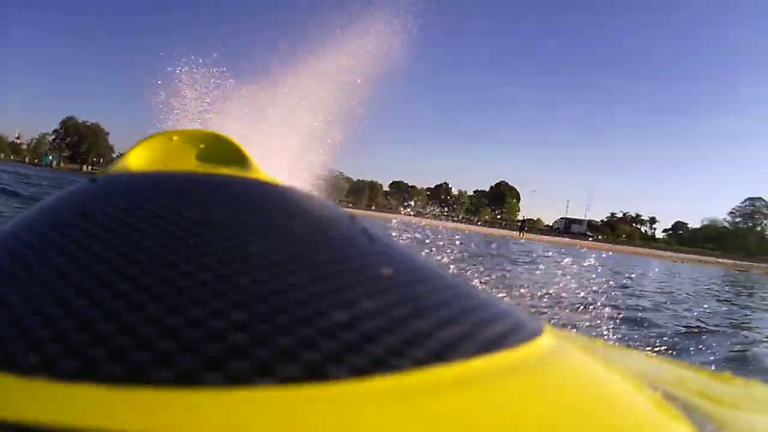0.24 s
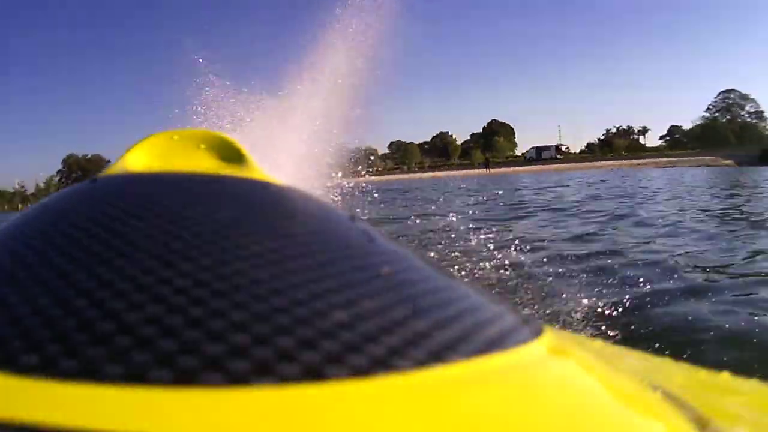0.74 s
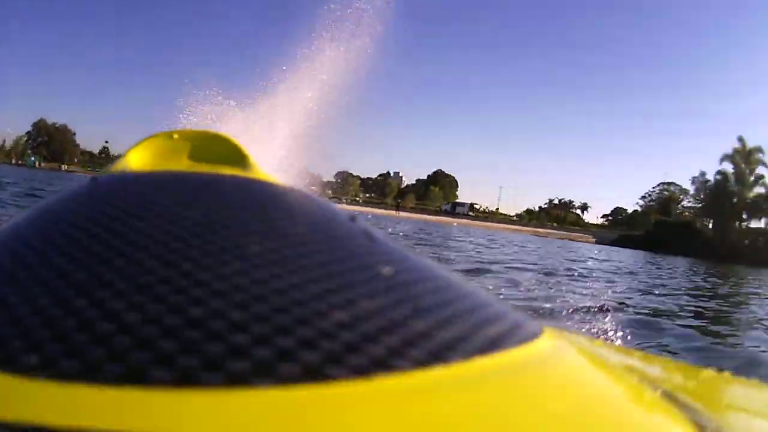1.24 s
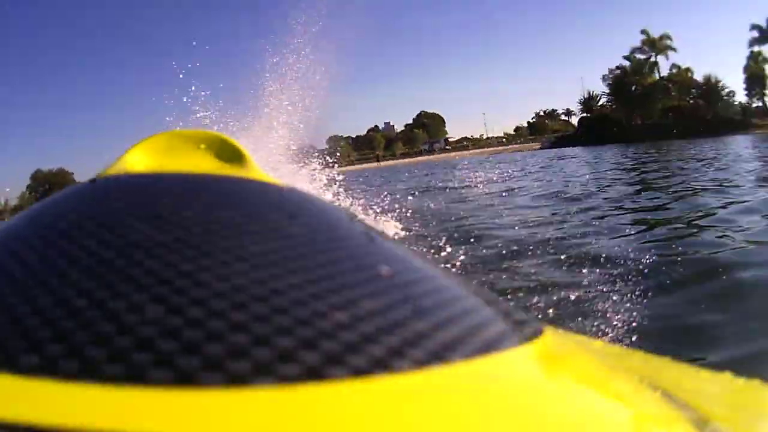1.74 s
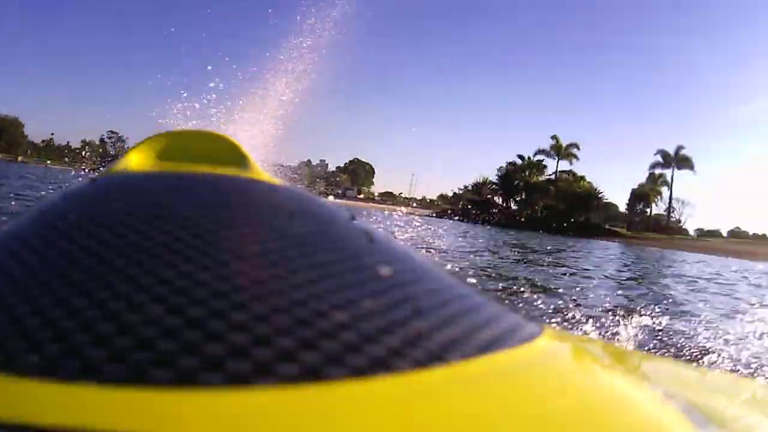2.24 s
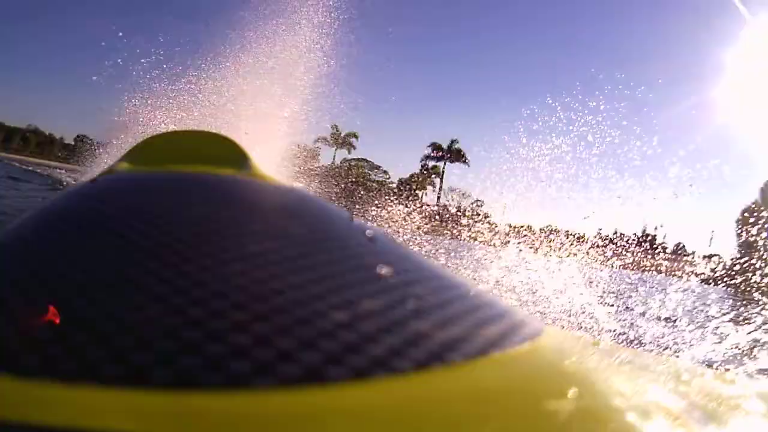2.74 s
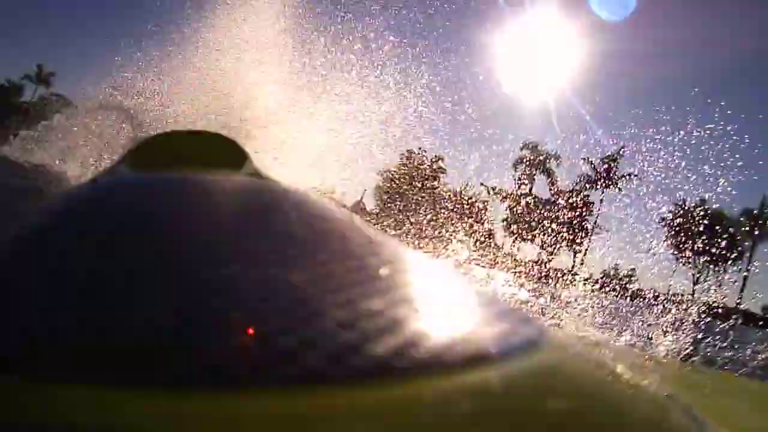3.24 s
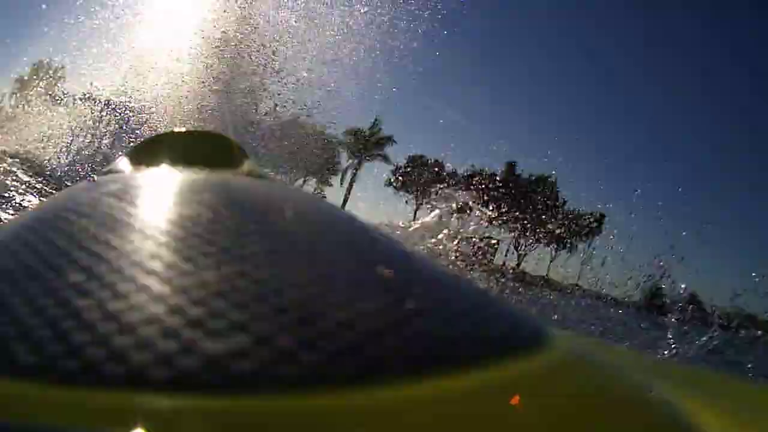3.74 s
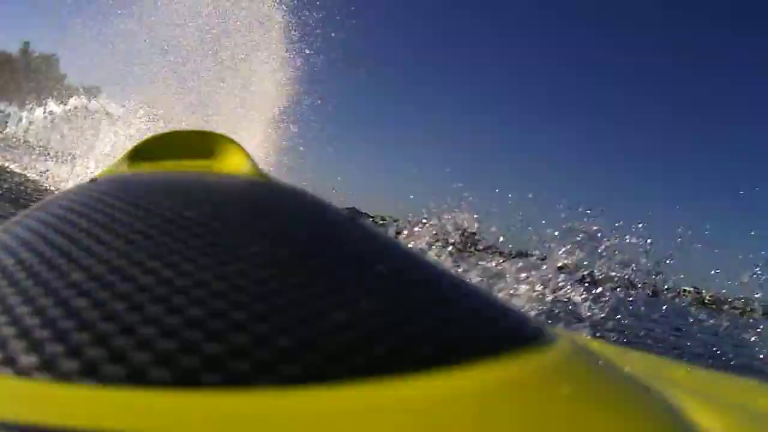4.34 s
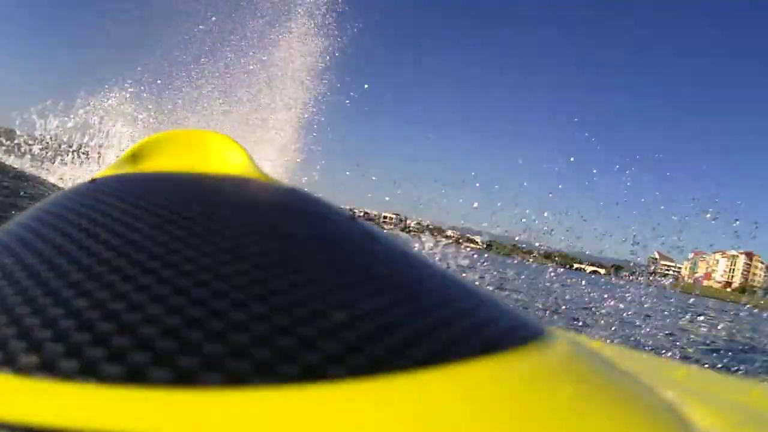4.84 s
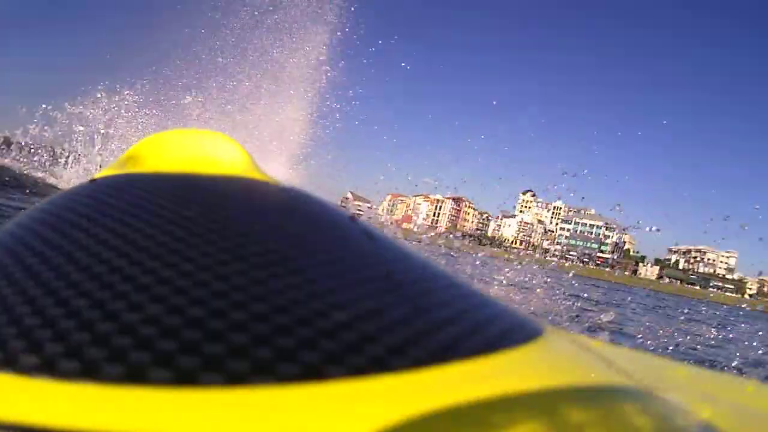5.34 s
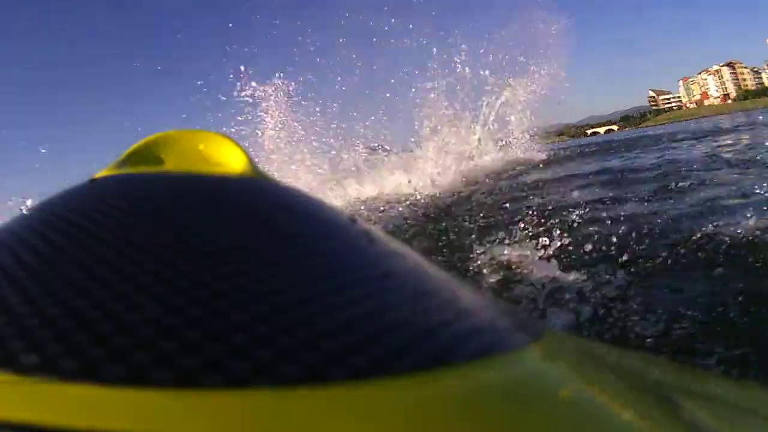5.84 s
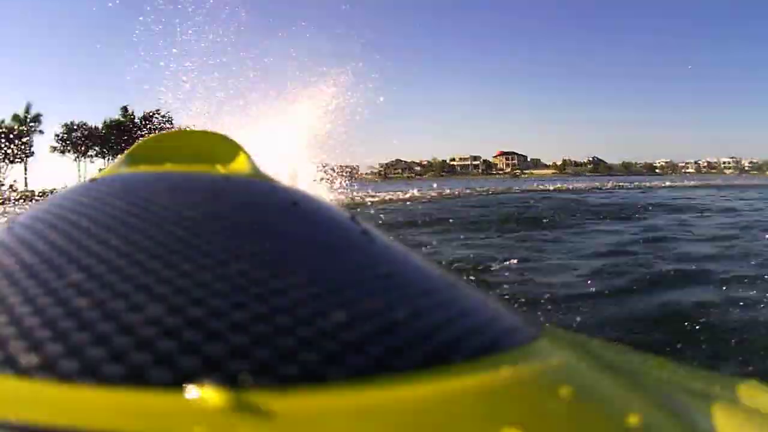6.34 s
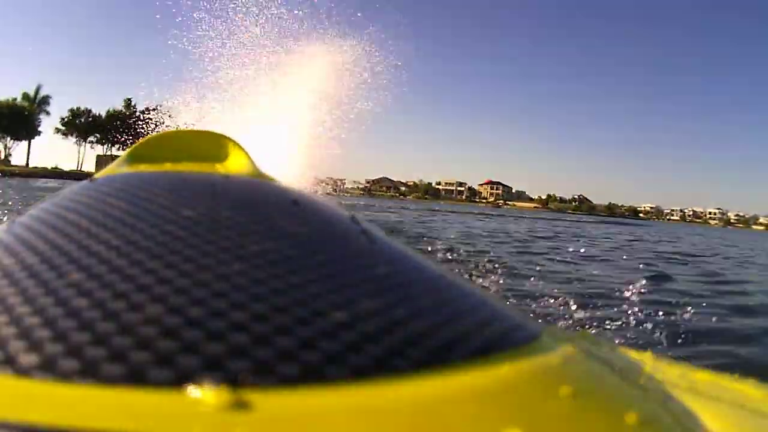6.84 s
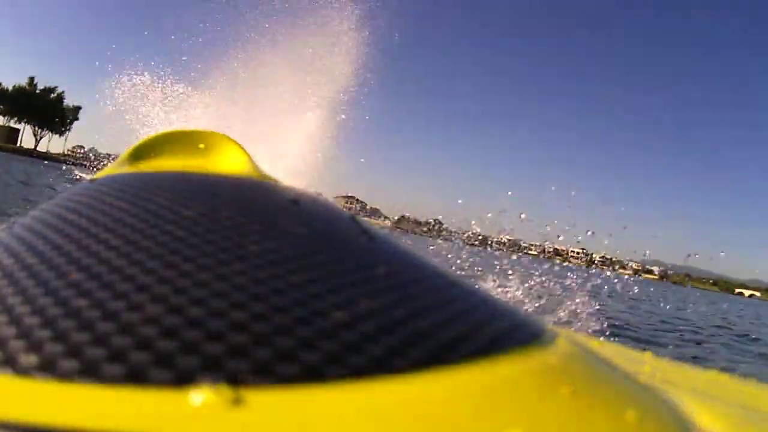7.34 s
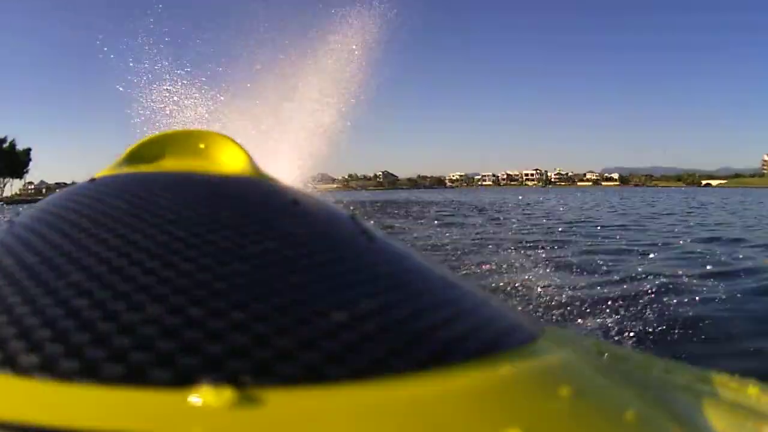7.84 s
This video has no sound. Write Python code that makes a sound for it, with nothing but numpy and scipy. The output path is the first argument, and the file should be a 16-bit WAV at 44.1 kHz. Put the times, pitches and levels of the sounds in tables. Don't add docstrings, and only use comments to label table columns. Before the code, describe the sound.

On open water, a microphone pressed to a model boat's deck picks up a rough, nasal propeller whine, ringing hull panels and steady water noise. Loud full throttle eases into a lower, fluttering drone; drops tick and slap the deck. A quick racing flare collapses in steps to a low idle, then the motor revs back up. The sound is boxy, dry and dull above four kilohertz.

```python
import sys
import numpy as np
from scipy import signal
from scipy.fft import rfft, irfft, next_fast_len
from scipy.io import wavfile
from scipy.ndimage import uniform_filter1d, map_coordinates

SR = 44100
rng = np.random.default_rng(int(sys.argv[2]) if len(sys.argv) > 2 else 0)


def wav_record(signal):
    frames = np.transpose(np.atleast_2d(signal))
    bounded = np.clip(frames, -1, 1)
    quanta = np.round(bounded * 32767).astype(np.int16)
    wavfile.write(sys.argv[1], SR, quanta)


def boost_factor(decibels):
    exponent = np.asarray(decibels, float) / 20
    return 10 ** exponent


N = 357210


def unit(x):
    return x / np.sqrt(np.mean(x ** 2) + 1e-20)


def along(points, hz):
    f, v = np.transpose(points)
    return np.interp(np.log(hz + 1), np.log(f + 1), v)


def curves(rows):
    s, *cols = np.transpose(rows)
    return [np.interp(np.arange(N) / SR, s, c) for c in cols]


def law(rows, speed):
    hz, *cols = np.transpose(sorted(rows))
    return [np.interp(speed, hz, c) for c in cols]


def bumps(rows):
    t = np.arange(N) / SR
    return sum(db * np.exp(-0.5 * ((t - s) / width) ** 2) for s, width, db in rows)


def wobble(rate):
    knots = rng.standard_normal(N // 64)
    return map_coordinates(knots, [np.arange(N) * min(rate, 600) / SR], order=2)


def filtered(x, response):
    m = next_fast_len(N + SR // 2)
    return irfft(rfft(x, m) * response(np.fft.rfftfreq(m, 1 / SR)), m)[..., :N]


def patchy(depth_db):
    z = signal.stft(rng.standard_normal(N + 512), nperseg=512)[2]
    field = uniform_filter1d(rng.standard_normal(z.shape), 5, 0)
    field = uniform_filter1d(field, 6, 1)
    return signal.istft(z * boost_factor(depth_db * unit(field)), nperseg=512)[1][:N]


# f/Hz, width/Hz, level/dB
HULL_PANELS = [
    (347, 146, -10),
    (597, 360, -24.5),
    (1060, 180, -4),
    (1162, 101, 3.5),
    (1419, 120, -1.5),
    (1840, 120, -7.5),
    (2298, 170, -13.5),
    (3406, 280, -22),
    (3924, 160, -18.5),
]


def panels(f):
    total = 0
    for k, (center, width, db) in enumerate(HULL_PANELS):
        resonance = 1j * f * width / (center * center - f * f + 1j * f * width)
        total = total + (-1) ** k * boost_factor(db) * resonance
    return total


def panel_gain(f):
    power = 1e-9
    for center, width, db in HULL_PANELS:
        power = power + (boost_factor(db) * f * width) ** 2 / ((center * center - f * f) ** 2 + (f * width) ** 2)
    return np.sqrt(power)


# t/s, shaft speed f/Hz
CRUISE = [(0, 418.8), (.12, 414.7), (.3, 420.3), (.71, 420), (1.13, 425.4), (2.8, 279.8), (3.32, 283.8),
          (3.4, 287.3), (3.9, 289.9), (4.26, 291), (4.6, 297.8), (5.425, 298.2), (7.27, 339.3),
          (7.3, 337.5), (7.72, 333.8), (7.9, 337.8), (8.05, 362), (8.1, 360.2)]
# t/s, shaft speed f/Hz
EASE_OFF = [
    (1.29, 418),
    (1.32, 414),
    (1.43, 362),
    (1.55, 338.7),
    (1.64, 295.3),
    (1.751, 268.3),
    (1.849, 272),
    (1.94, 280.1),
    (1.991, 280),
]
# t/s, shaft speed f/Hz
LEAP = [
    (5.445, 340),
    (5.515, 373.8),
    (5.539, 368.2),
    (5.6, 332.4),
    (5.649, 322.6),
    (5.668, 272.7),
    (5.715, 266),
    (5.739, 215.7),
    (5.801, 184.6),
]
# t/s, shaft speed f/Hz
PICK_UP = [
    (5.84, 184.4),
    (5.981, 194.3),
    (6.259, 193.5),
    (6.35, 235.6),
    (6.4, 293.6),
    (6.45, 320.5),
    (6.78, 323.4),
    (6.802, 331.4),
    (6.88, 338),
]


def throttle():
    speed, = curves(sorted(CRUISE + EASE_OFF + LEAP + PICK_UP))
    return speed


# t/s, blade load level/dB, shaft shake level/dB, wetted hull level/dB
RIDE = [(0, 5, 7, -1), (1.3, 2, 2.5, 0), (1.7, -3, -2, -1.5), (2.2, -5, -1, 0), (2.6, 1.5, -1, -1),
        (3.27, 1, -3, 0), (3.33, -5, -4.5, 0), (3.75, -0.5, 0, 2), (4.3, -1.5, -5, 2), (5.35, -1.5, -5, 2),
        (5.53, 0, .5, 1), (5.8, -5, -1.5, 0), (6.04, 4.5, 5, 0.5), (6.3, -2, 1, 0), (6.65, -1.5, -7, -.5),
        (7.3, 3, 0, .5), (7.95, 2.5, 3, 2), (8.1, 8.5, 2, 2.5)]


def ride():
    return curves(RIDE)


def drifting(levels_db):
    return [db + 0.9 * wobble(7) for db in levels_db]


def partial(turns, multiple, lag, flutter_db, slip):
    size = unit(boost_factor(flutter_db * wobble(40)))
    return -np.sqrt(2) * size * np.cos(2 * np.pi * multiple * turns - lag + slip * wobble(30))


# shaft speed f/Hz, then level/dB of unbalance, whirl at 1.5 turns, third, fifth
SHAFT_LAW = [(186, -24.5, -67, -42, -39), (194.4, -30, -72, -30.5, -26), (236, -23.5, -68, -42, -19.5),
             (266, -23.5, -53, -38, -35), (281.4, -31.5, -57, -26.5, -26), (288.7, -24.5, -44, -37, -20),
             (321.5, -21.5, -34.5, -25, -34.5), (332, -22, -35, -16.5, -26.5), (365, -21, -40, -18.5, -24),
             (420, -17.5, -48, -16, -34)]
SHAKE_SHARE = [0.85, .05, 0.7, 0.9]
# shaft speed f/Hz, then level/dB of second, fourth, sixth, eighth order
BLADE_LAW = [(183.4, -24, -24, -40, -23.5), (194.36, -24.5, -36, -16.5, -36.5), (234, -23, -27, -31.5, -37),
             (275.3, -20.5, -21.5, -48, -53), (282.3, -19, -14.5, -29.5, -32.5),
             (298.8, -25, -24.5, -35.5, -37), (310, -25.5, -23, -31.5, -42.5), (340, -28.5, -24, -35, -39),
             (368.6, -18.5, -15, -32, -39.5), (420, -15, -19, -28.5, -23.5)]
BLADE_SHARE = [0.8, 1.26, 1.3, 0.74]
# shaft speed f/Hz, then level/dB of seventh, tenth, eleventh, twelfth
UPPER_LAW = [(186, -42, -38, -50, -34), (194, -26, -36, -37, -42), (236, -44, -44, -50, -40),
             (268, -40, -42, -54, -34), (281, -38, -44, -46, -38.5), (296, -44, -49, -44, -43),
             (323, -32, -44, -44, -44), (337, -33, -39, -43, -55), (365, -32, -37, -45, -58),
             (420, -41, -42, -56, -60)]
# multiple of shaft speed, level/dB against the eighth
FAINT_ORDERS = [
    (9, 2),
    (13, 0),
    (14, 0),
]
# t/s, width t/s, unbalance level/dB, second order level/dB
LOW_ORDER_SWELLS = [(1.5, 0.057, 9, 2.5), (2.1, 0.19, -0.5, 4.5), (2.72, 0.054, -4, 3.5), (2.88, .03, -8.5, -1.5),
                    (5.3, 0.039, 2, -9), (5.48, 0.034, 6.5, -9), (5.6, 0.028, -3, -3), (5.7, 0.015, -13, 1),
                    (6.27, .02, -4, 3.5), (6.39, 0.027, -8.5, -9.5), (6.45, .03, 4.5, -0.5), (6.6, 0.049, -17.5, 4.5),
                    (7.06, .06, -2.5, -3.5)]


def motor(speed, blade_db, shake_db, load):
    shaft_db = drifting(law(SHAFT_LAW, speed)) + shake_db * np.c_[SHAKE_SHARE]
    first_db, whirl_db, third_db, fifth_db = shaft_db
    blades_db = drifting(law(BLADE_LAW, speed)) + blade_db * np.c_[BLADE_SHARE]
    second_db, fourth_db, sixth_db, eighth_db = blades_db
    upper_db = drifting(law(UPPER_LAW, speed)) + 0.7 * blade_db
    first_db = first_db + bumps([(s, width, db) for s, width, db, _ in LOW_ORDER_SWELLS])
    second_db = second_db + bumps([(s, width, db) for s, width, _, db in LOW_ORDER_SWELLS])
    turns = np.cumsum(speed * (1 + 0.001052 * wobble(25))) / SR

    def lag(k):
        return 0.85 * np.arctan((k * speed - 1150) / 300)

    low = boost_factor(first_db) * partial(turns, 1, lag(1), flutter_db=2.2, slip=0.12)
    low += boost_factor(second_db) * partial(turns, 2, lag(0.56), flutter_db=2.02, slip=0.093)
    low += boost_factor(whirl_db) * partial(turns, 1.5, 0, flutter_db=1, slip=0.3)
    low += boost_factor(whirl_db - 7) * partial(turns, 2.5, 0, flutter_db=2, slip=0.3)

    rough_db = 1.2 * speed / 280
    levels = {3: third_db, 4: fourth_db, 5: fifth_db, 6: sixth_db, 8: eighth_db}
    levels.update(zip([7, 10, 11, 12], upper_db))
    ring = np.zeros(N)
    for k, db in levels.items():
        ring += boost_factor(db) * partial(turns, k, lag(k), flutter_db=rough_db, slip=0.2)

    grid = np.arange(1, SR // 2)
    gain = panel_gain(grid) ** 2.17
    drive = boost_factor(eighth_db) / np.interp(8 * speed, grid, gain)
    for k, db in FAINT_ORDERS:
        k = round(k)
        strength = drive * boost_factor(db) * np.interp(k * speed, grid, gain)
        ring += strength * partial(turns, k, lag(k), flutter_db=2, slip=0.25)
    return low + load * ring, turns


# shaft speed f/Hz, then level/dB of rush through the hull, spray hiss, rumble
WATER_LAW = [(190, -23.5, -28, -50), (298.5, -17.5, -28, -44.5), (297, -22.5, -28.5, -42.5),
             (303, -24.5, -27.5, -49), (324, -20.5, -29, -50.5), (338, -18, -28, -40.5),
             (420, -12, -16.5, -39)]
# f/Hz, level/dB per Hz
SPRAY_COLOR = [(100, -30.5), (200, -31.5), (500, -1), (1000, -4.5), (1800, -0.5), (2500, 1.5), (3000, -4.5),
               (3400, -1.5), (3900, -3.5), (4400, -11.5)]
# f/Hz, level/dB per Hz
RUMBLE_COLOR = [(10, 8), (30, -0.5), (70, 2), (140, -6), (300, -29), (600, -44.5)]


def water(speed, wet_db, turns, load):
    step = 1 / (0.05 * SR + 1)
    late = signal.lfilter([step], [1, step - 1], speed - speed[0]) + speed[0]
    wet_share = np.c_[[0.3, 1, 0.1]]
    rush_db, spray_db, rumble_db = law(WATER_LAW, late) + wet_db * wet_share
    beat = 1 + 0.047 * np.cos(2 * np.pi * turns)

    rush = patchy(depth_db=1.0) * beat * boost_factor(1.53 * wobble(60))
    rush = unit(filtered(rush, panel_gain))

    spray = patchy(depth_db=1.5) * beat * boost_factor(1.7 * wobble(150))
    spray = unit(filtered(spray, lambda hz: boost_factor(along(SPRAY_COLOR, hz))))
    mist_hz, mist_wide_hz, mist_grows = 2570, 330, 1.4
    mist = filtered(spray, lambda hz: np.exp(-0.5 * ((hz - mist_hz) / mist_wide_hz) ** 2))
    spray += (boost_factor(mist_grows * wet_db) - 1) * mist

    rumble = rng.standard_normal(N) * boost_factor(2.1 * wobble(29))
    rumble = unit(filtered(rumble, lambda hz: boost_factor(along(RUMBLE_COLOR, hz))))
    return boost_factor(rush_db + 0.83) * load * rush + boost_factor(spray_db + 2.0) * spray + boost_factor(rumble_db + 1.8) * rumble


# t/s, change of level/dB
WAVES = [(1.668, 3.5), (1.76, -1), (1.791, -3), (2.228, -3), (2.248, 6), (2.351, 4.5), (2.375, -6),
         (2.398, 5), (2.511, 3.5), (2.574, 5), (2.73, 5), (2.88, 4.5), (3.307, -7.5), (3.688, 1.5),
         (4.824, 1.5), (5.155, 3), (5.528, 3.5), (5.871, -0.5), (6.339, 5.5), (6.373, -1), (6.522, -3),
         (7.005, 2.5), (7.081, 3), (7.337, 2.5), (7.44, 2.5), (7.53, 3), (7.604, -3), (7.76, 1),
         (7.89, -1.5), (7.97, -9)]


def hull_load(width_s):
    return boost_factor(bumps([(s, width_s, db) for s, db in WAVES]))


# t/s, peak level/dB
SLAPS = [
    (1.8083, -6),
    (2.6314, -9),
    (3.982, -9),
    (4.0295, -3.5),
    (4.1022, 0),
    (7.2225, -3),
]


def slaps():
    push = np.zeros(N)
    push[0] = 1
    ring = filtered(push, panels)[:SR // 10]
    ring /= -ring[np.argmax(np.abs(ring))]
    hits = np.zeros(N)
    for s, db in SLAPS:
        hits[round(s * SR)] = boost_factor(db)
    return signal.fftconvolve(hits, ring)[:N]


def scene():
    speed = throttle()
    blade_db, shake_db, wet_db = ride()
    load = hull_load(width_s=0.013)
    whine, turns = motor(speed, blade_db, shake_db, load)
    return (whine + water(speed, wet_db, turns, load) + slaps())[None]


# f/Hz, level/dB
CAMERA_BAND = [(10, -1), (3700, 0.5), (4000, -8), (4200, -7.5), (4400, -19), (4600, -43.5),
               (4800, -110)]


def camera_band(x):
    return filtered(x, lambda hz: boost_factor(along(CAMERA_BAND, hz)))


def top_cut(x):
    return signal.sosfilt(signal.butter(12, 15830, fs=SR, output="sos"), x)


def record(dry):
    stage = dry / (1 + np.abs(dry / 0.79) ** 5) ** (1 / 5)
    ceiling = 0.71
    flat = np.clip(camera_band(stage), -ceiling, ceiling)
    return top_cut(flat)


dry = scene()
out = record(dry)
wav_record(out)
```